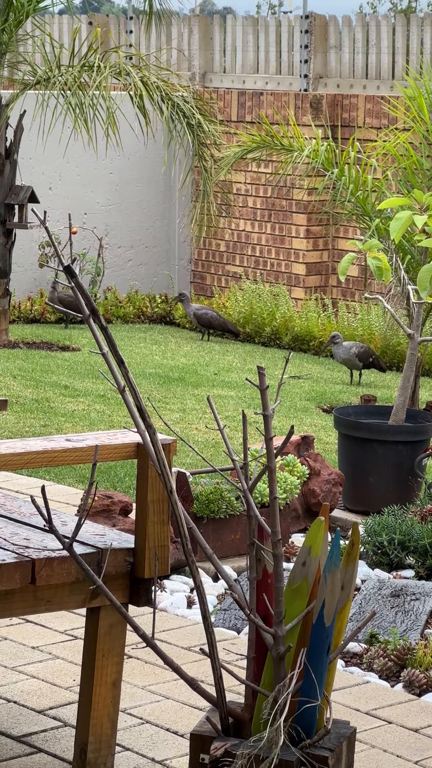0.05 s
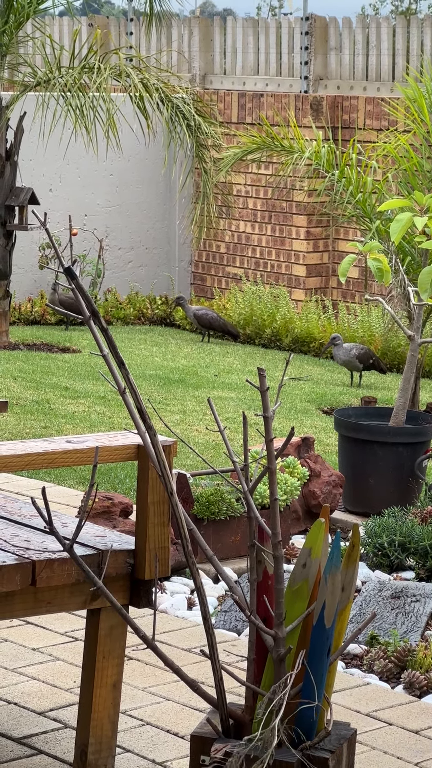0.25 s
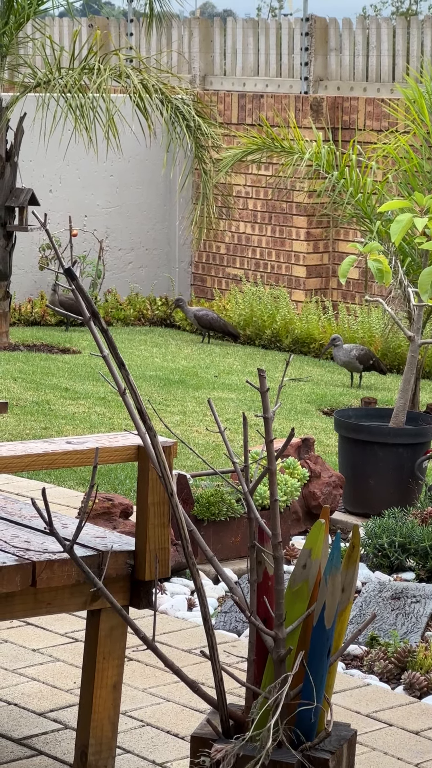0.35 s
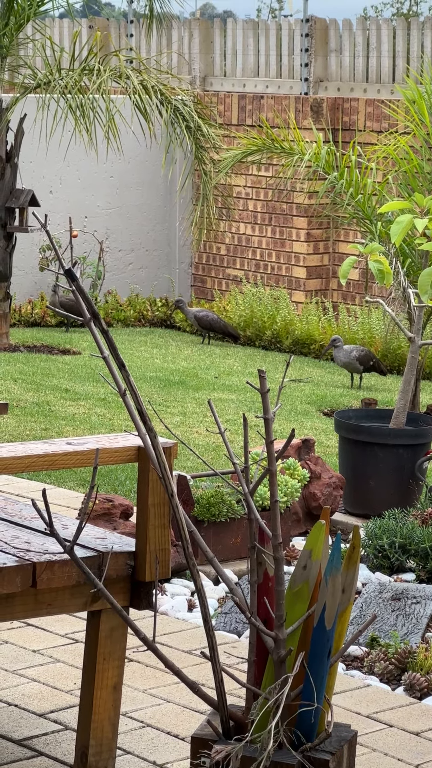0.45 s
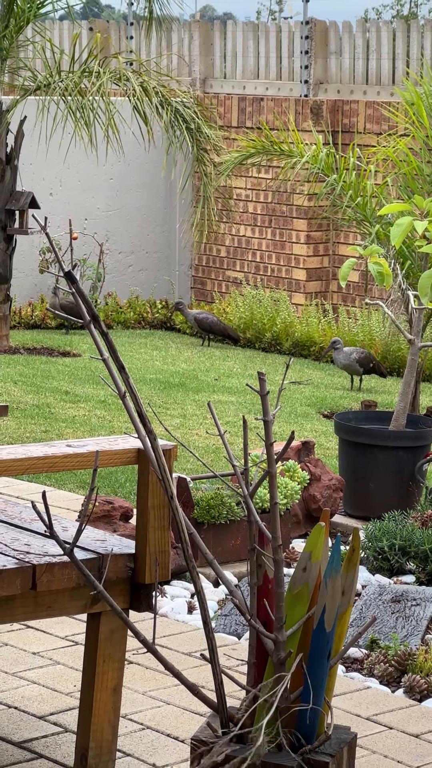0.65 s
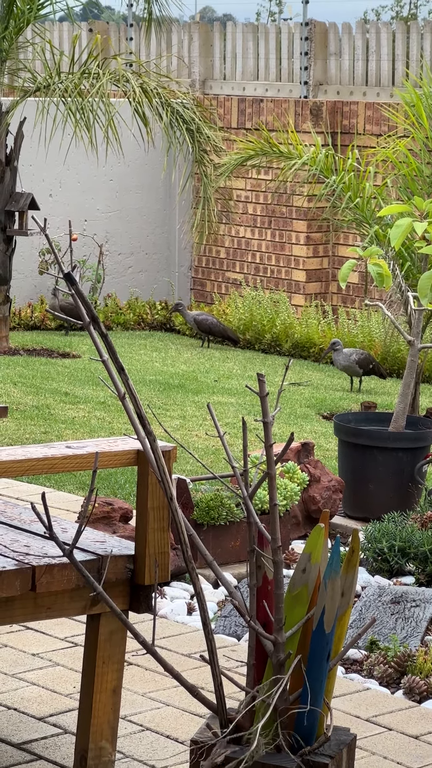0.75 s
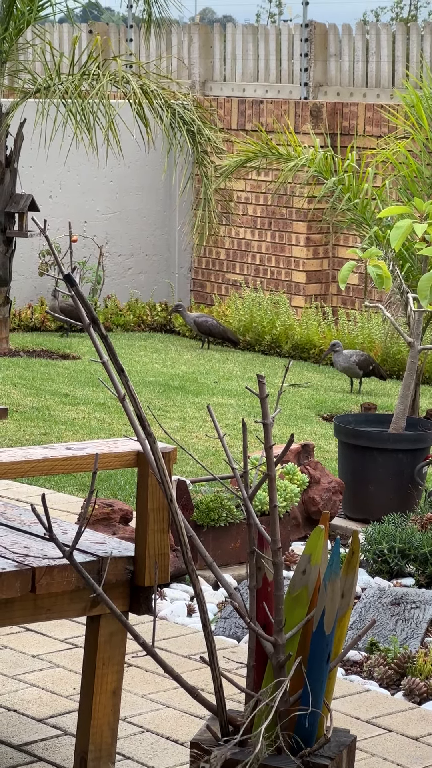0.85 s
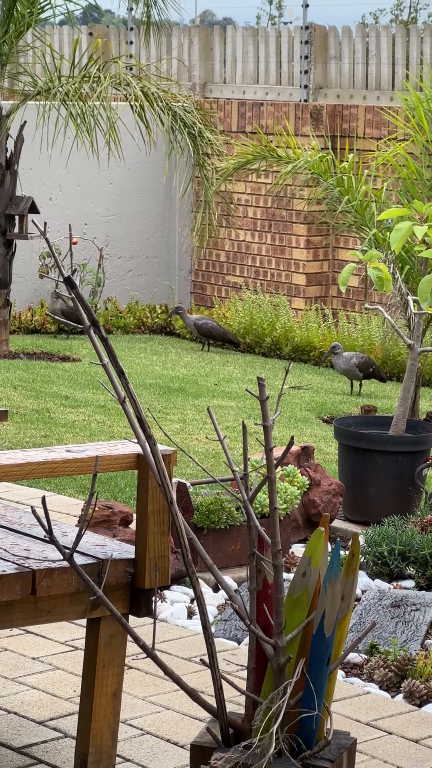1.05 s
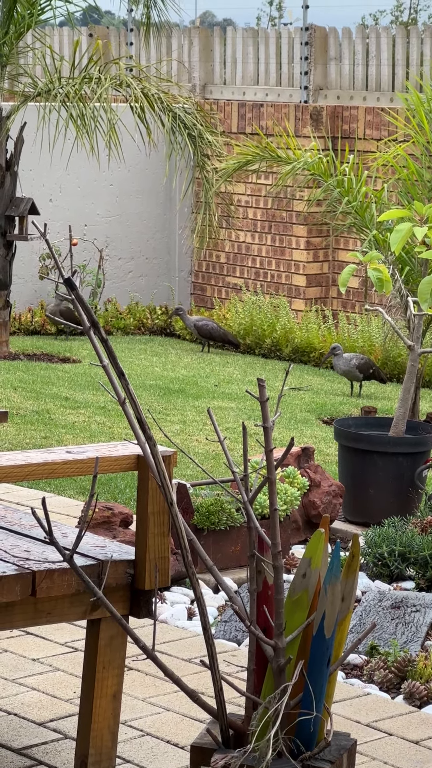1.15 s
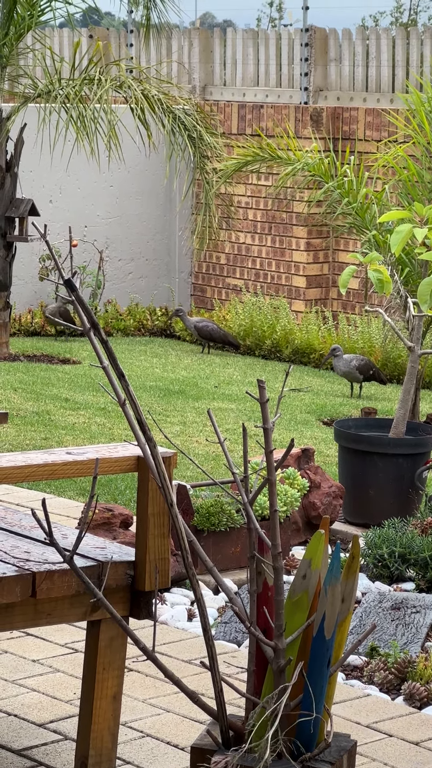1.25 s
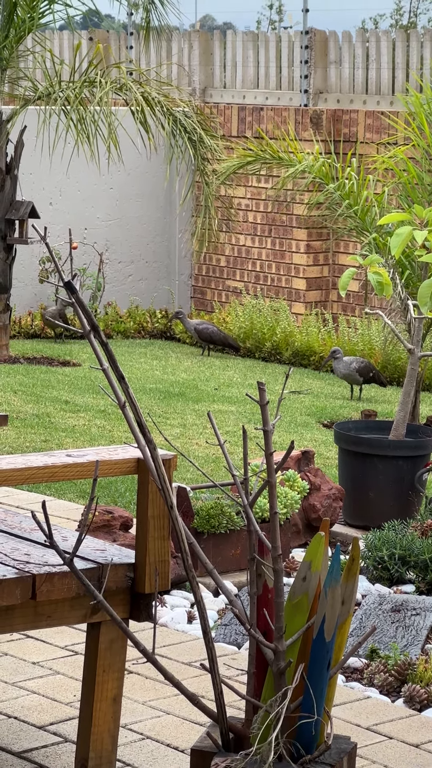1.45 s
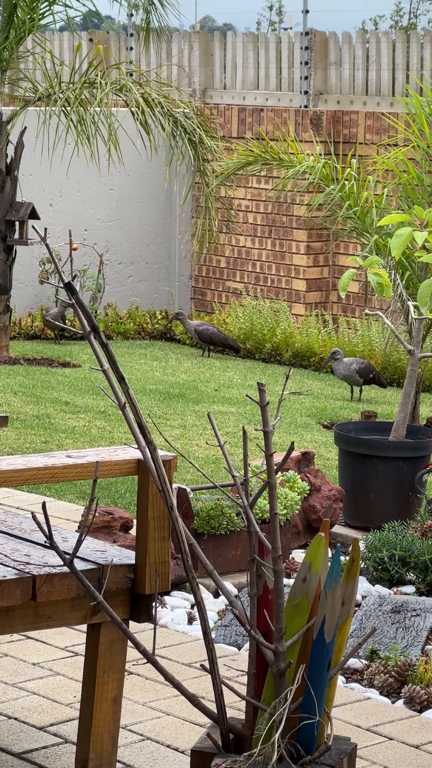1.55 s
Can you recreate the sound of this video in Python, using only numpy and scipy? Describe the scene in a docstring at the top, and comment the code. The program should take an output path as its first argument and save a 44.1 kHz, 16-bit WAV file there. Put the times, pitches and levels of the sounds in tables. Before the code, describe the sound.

Quiet low suburban rumble and faint wavering machine hum for 0.2 seconds, then a large bird's loud, harsh, nasal cry bursts in. It has a rough start, swoops up by about 0.33, holds bright and steady, then sags from 0.4 to a rough, falling end near 0.88. Dense garden-wall echoes thicken it and fade, leaving soft rumble and hum until about 1.6 seconds.

```python
"""A walled garden, where a large bird gives one harsh, nasal cry over a low suburban rumble and a far machine hum.
The rumble is filtered noise; the hum is a few low tones that waver in pitch and level.
The cry is a row of harmonics, coloured by the throat, whose pitch swoops up and then sags.
Brick walls and paving answer with dense echoes, made from fading noise."""
import sys
import numpy as np
from scipy import signal
from scipy.fft import rfft, irfft, next_fast_len
from scipy.io import wavfile
from scipy.ndimage import uniform_filter1d

SR = 44100
rng = np.random.default_rng(int(sys.argv[2]) if len(sys.argv) > 2 else 0)


def store_pcm(level_fs):
    """Save levels as 16-bit WAV."""
    pcm = np.round(np.clip(level_fs, -1, 1) * 32767).astype(np.int16)
    wavfile.write(sys.argv[1], SR, np.atleast_2d(pcm).T)


N = 70560  # samples, 1.6 s
PAD = next_fast_len(N + SR)  # filter length, with a second to spare for echoes
HZ = np.maximum(np.arange(PAD // 2 + 1) * SR / PAD, 1)  # the frequencies of the filters


def amp(db):
    """Turn decibels into a gain."""
    return 10 ** (np.asarray(db) / 20)


def rms_one(x):
    """Scale a sound to an rms (average strength) of 1."""
    return x / np.sqrt(np.mean(x ** 2) + 1e-20)


def in_time(rows):
    """Draw straight lines between the rows of a time table, one curve per column."""
    seconds, *columns = np.transpose(rows)
    t = np.arange(N) / SR
    return [np.interp(t, seconds, column) for column in columns]


def at_hz(points, hz):
    """Read a frequency table at any frequency, along a log axis."""
    table_hz, values = np.array(points).T
    return np.interp(np.log(hz), np.log(np.maximum(table_hz, 1)), values)


def shaped(x, response):
    """Filter a sound by multiplying its spectrum."""
    return irfft(rfft(x, PAD) * response, PAD)[..., :N]


def drift(rate_hz):
    """Smooth random wandering around zero, with an rms near 1: noise through a two-step low-pass."""
    r = np.exp(-2 * np.pi * rate_hz / SR)
    wander = signal.lfilter([1], [1, -2 * r, r * r], rng.standard_normal(N + SR))
    return rms_one(wander[SR:])  # drop the filter's start-up


# Colour of the rumble: (frequency [Hz], relative level [dB per Hz])
RUMBLE_COLOUR = [(20, -14.5), (50, 1.5), (130, -6.5), (250, -6.5), (400, -12), (560, -15.5), (900, -9.5),
                 (1600, -19.5), (2500, -25), (4000, -34), (6000, -36), (9000, -49.5), (16000, -50.5)]
# Level of the rumble before its upper part is changed: (time [s], level [dB])
RUMBLE_LEVEL = [(0, -57.5), (.2, -50), (.4, -50.5), (.65, -56), (.9, -58), (1.2, -58.5), (1.6, -59)]
# Gain of the rumble's upper part: (time [s], level [dB])
UPPER_RUMBLE_GAIN = [(0, 5), (.25, -6.5), (.4, -6.5), (.6, -5.5), (.75, 9), (.95, 2), (1.6, 2.5)]
UPPER_FROM_HZ = 650


def rumble():
    """Low suburban rumble: two noises, for the common and the differing sound, with a changing upper part."""
    noise = rms_one(shaped(rng.standard_normal((2, PAD)), amp(at_hz(RUMBLE_COLOUR, HZ))))
    upper = shaped(noise, 1 / (1 + (UPPER_FROM_HZ / HZ) ** 4))
    lower = noise - upper
    return amp(in_time(RUMBLE_LEVEL)[0]) * (lower + amp(in_time(UPPER_RUMBLE_GAIN)[0]) * upper)


HUM_FLUTTERS_PER_S = 9.8


def hum_line(hz, waver_hz, flutter_db):
    """One machine tone: a sine that wavers in pitch and flutters in level."""
    wavering_hz = hz + waver_hz * drift(2 * HUM_FLUTTERS_PER_S)
    phase = 2 * np.pi * np.cumsum(wavering_hz) / SR
    flutter = amp(flutter_db * drift(HUM_FLUTTERS_PER_S))
    return rms_one(flutter * np.sin(phase + rng.uniform(0, 2 * np.pi)))


# Hum tones: (frequency [Hz], pitch waver [Hz], level flutter [dB], level [dB rms])
HUM_TONES = [(52.98, 2, 4, -67), (113, 1.5, 3.5, -49), (157, 1.7, 7.5, -60.5), (232, 6.9, 2.5, -64.5),
             (344.6, 3, 3, -62)]
# Level of one more low tone, the throb: (time [s], level [dB])
THROB_LEVEL = [(0.0, -46), (0.07, -43), (0.646, -53), (0.748, -40.5), (0.802, -50), (1.166, -50),
               (1.426, -62), (1.6, -52)]
THROB_HZ, THROB_WAVER_HZ, THROB_FLUTTER_DB = 77, 1.8, 2.2


def machine_hum():
    """Far machinery: several wavering tones together, one of them rising and falling as a throb."""
    tones = sum(amp(db) * hum_line(*tone) for *tone, db in HUM_TONES)
    throb = hum_line(THROB_HZ, THROB_WAVER_HZ, THROB_FLUTTER_DB)
    return tones + amp(in_time(THROB_LEVEL)[0]) * throb


# The cry: (time [s], pitch [Hz], level [dB], brightness [dB per octave], pitch jitter [%],
# throat resonances [times their resting frequency])
CRY = [(.210, 290, -40, -3.5, 5.8, 0.68), (.218, 380, -24, -3.5, 7, 0.88),
       (.232, 467.3, -13.5, 2, 3.2, 1.056), (.25, 544.6, -14, -2.8, 2.5, 0.97),
       (.278, 598.4, -9.5, -0.5, .6, 1.016), (.326, 617.5, -11, 3, 0.061, 1.03),
       (.36, 617.8, -12, -3, .03, 1.072), (.416, 607.9, -12.5, 5.5, .03, 1.03),
       (.47, 582.3, -9.5, -2, .03, 1.01), (.528, 560.7, -15, -0.5, .04, .99),
       (.576, 537.8, -17.5, -2, .05, .99), (.632, 521.6, -14, -1, .07, .98),
       (.694, 493.8, -16, -1.5, 0.049, .98), (.734, 479.5, -18, -2.5, .15, .97),
       (.776, 458, -22.5, 0, .5, 0.98), (.804, 431.5, -23, -4, 2.5, .95),
       (.825, 406.2, -36.5, -12.5, 6, 1.03), (.85, 329.6, -39, -16, 10, 0.56),
       (.878, 237.2, -62, 2, 8.7, 2.7)]
# Resonances of the throat and open bill: (frequency [Hz], level [dB])
THROAT = [(250, -35.5), (400, -34), (600, -21), (1100, -18.5), (1500, 4), (1800, -4.5), (2100, -6),
          (2450, -6), (3000, -12), (3600, -12), (4100, -1.5), (4700, -4), (5400, 0.5), (6000, -15),
          (6800, -12), (8000, -26), (9500, -28.5), (11000, -32.5), (12200, -35), (13500, -34),
          (16000, -35.5)]
JITTER_PER_S = 200  # how fast the pitch jitters
STEADY_PERCENT = .07  # share taken off the jitter throughout, so that the middle of the cry is steady
BREATH_DB = -58  # air noise against the voice


def cry():
    """Pulses of the voice organ ring in the throat: steady mid-cry, uneven at both ends, with a little air."""
    curves = in_time(CRY)
    for _ in range(2):  # round off the corners
        curves = uniform_filter1d(curves, size=450, mode="nearest")
    hz, level_db, brightness, jitter, opening = curves

    uneven = np.maximum(jitter - STEADY_PERCENT, 0) / 100 * drift(JITTER_PER_S)
    phase = 2 * np.pi * np.cumsum(hz * (1 + uneven)) / SR
    throat = amp(at_hz(THROAT, HZ))
    # Phase shifts of a throat that cannot ring before its pulse
    both_sides = np.r_[throat, throat[-2:0:-1]]
    ringing = -np.imag(signal.hilbert(np.log(both_sides)))[:len(HZ)]

    voice, power = np.zeros(N), np.zeros(N)
    for k in range(1, 56):  # harmonics
        harmonic_hz = k * hz
        resting_hz = harmonic_hz / opening  # where this lands in the resting throat
        octaves = np.minimum(np.log2(harmonic_hz / 2000), 1.5)
        gain = amp(at_hz(THROAT, resting_hz) + brightness * octaves) * (harmonic_hz < 16500)
        voice += gain * np.cos(k * phase + np.interp(resting_hz, HZ, ringing))
        power += gain ** 2 / 2
    voice = voice / np.sqrt(power)  # so the level curve alone sets the strength

    air = rms_one(shaped(rng.standard_normal(N) * (1 + np.cos(phase)), throat))  # puffs with the pulses
    t = np.arange(N) / SR
    sounding = (t > CRY[0][0]) * (t < CRY[-1][0])
    return amp(level_db) * (voice + amp(BREATH_DB) * air) * sounding


# Long echo tail: (frequency [Hz], time to fall by 60 dB [s], level [dB])
TAIL = [(300, 0.64, -9), (1494, 0.76, -14.5), (2500, 0.65, -14.5), (4000, .7, -16.5), (5200, 0.45, -13.5),
        (7894, .36, -3), (15000, .25, -17.5)]
FIRST_ECHO_S = .004
NEAR_PEAK_S, NEAR_S, NEAR_DB = .012, 0.031, -3  # near-wall echoes: peak time, spread, level
LUMPY_DB, LUMPS_PER_S = 3.5, 240  # how uneven the near echoes are, and how fast that changes


def garden(x):
    """Two unrelated echo patterns: a short lumpy cluster from near walls and a longer tail that dies by band."""
    t = np.arange(SR) / SR
    echoes = np.zeros((2, SR))
    white = rng.standard_normal((2, 2, SR))  # near and far, two patterns each
    white[0] = white[0] * rms_one(amp(LUMPY_DB * drift(LUMPS_PER_S)[:SR]))
    started = t > FIRST_ECHO_S
    near_fade = np.exp(-((t - NEAR_PEAK_S) / NEAR_S) ** 2) * started
    tail = np.array(TAIL)
    edges_hz = [100, 500, 1000, 2000, 3200, 4600, 6200, 8200, 11000, 18000]
    for low, high in zip(edges_hz, edges_hz[1:]):
        band = signal.butter(3, [low, high], "band", fs=SR, output="sos")
        near, far = signal.sosfilt(band, white)
        middle_hz = np.sqrt(low * high)
        t60 = at_hz(tail[:, [0, 1]], middle_hz)
        far_db = at_hz(tail[:, [0, 2]], middle_hz)
        far_fade = amp(-60 * t / t60) * started
        for noise, db, fade in (near, NEAR_DB, near_fade), (far, far_db, far_fade):
            echoes += amp(db) * noise * fade / np.sqrt(np.sum(fade ** 2))
    return shaped(x, rfft(echoes, PAD))


# Gain of the sound that differs between the two microphones: (frequency [Hz], level [dB])
WIDTH = [(60, -50.5), (200, -26), (500, -7.5), (800, -15), (1500, -23), (3000, -33.5), (5000, -15.5),
         (8000, -21.5), (16000, -40)]
# Phase of the left channel against the right: (frequency [Hz], phase [radians], negative where the left lags)
LEFT_PHASE = [(20, 0), (300, 0), (2200, .12), (4900, .2), (5400, -.4), (6300, -.8), (8000, -1.6),
              (9500, -2.4), (10500, -3.14), (13500, -3.14), (14700, -3.8), (16000, -3.9)]
DIRECT_DB = -9  # gain of the cry's direct sound


def scene():
    """The bird and its echoes over the background at two close microphones: left is sum, right is difference."""
    bird = cry()
    echoes = garden(bird)
    background = rumble()
    background[0] += machine_hum()  # the hum is common to both microphones
    common, differing = echoes + background
    common = common + amp(DIRECT_DB) * bird
    differing = shaped(differing, amp(at_hz(WIDTH, HZ)))
    turn = np.exp(.5j * at_hz(LEFT_PHASE, HZ))  # half the phase on each side
    left = shaped(common + differing, turn)
    right = shaped(common - differing, 1 / turn)
    return np.array([left, right])


CUTOFF_HZ = 15950


def record(dry):
    """A steep low-pass cuts off the very top of the treble."""
    low_pass = signal.cheby2(14, 70, CUTOFF_HZ, fs=SR, output="sos")
    return signal.sosfilt(low_pass, dry)


dry = scene()
out = record(dry)
store_pcm(out)
```